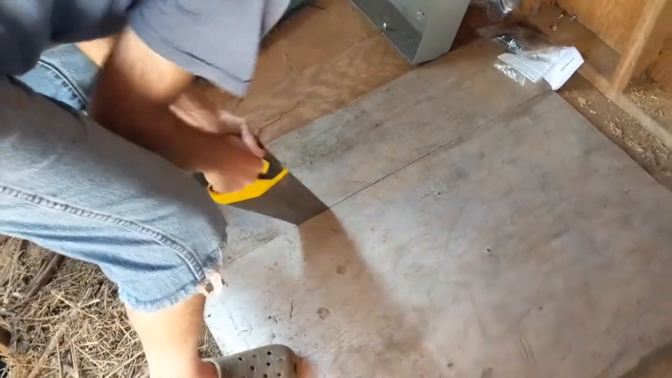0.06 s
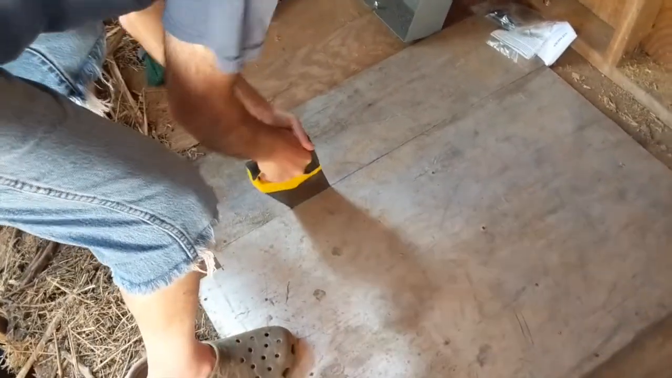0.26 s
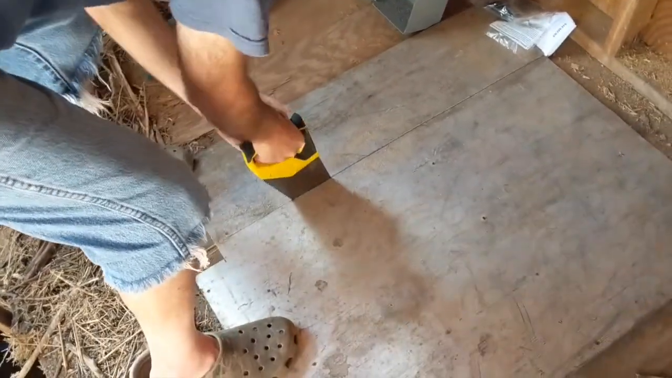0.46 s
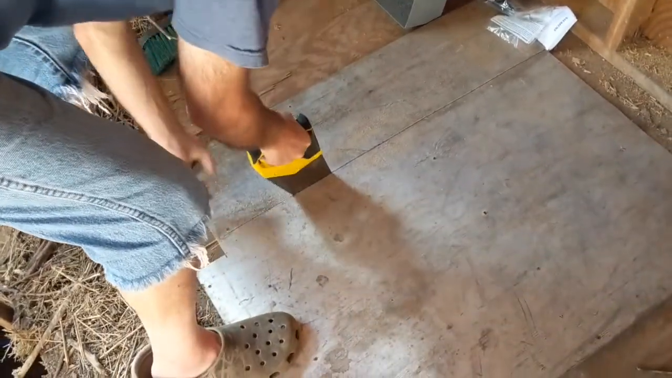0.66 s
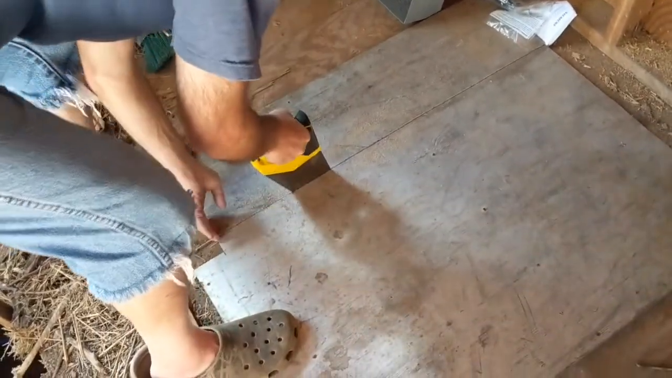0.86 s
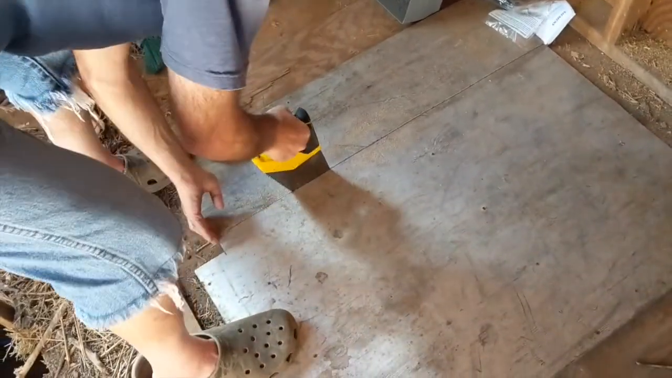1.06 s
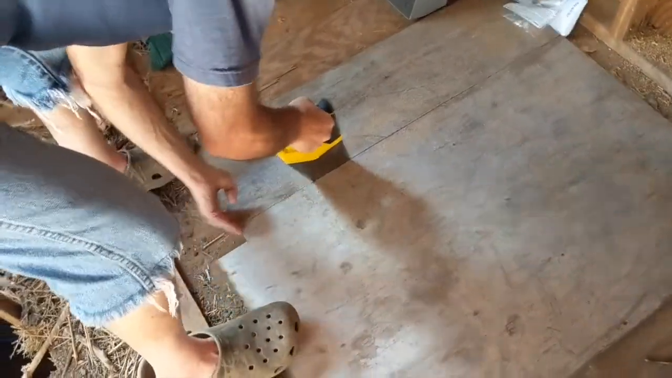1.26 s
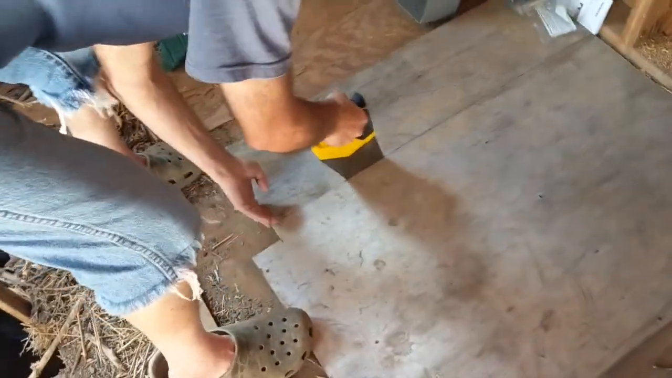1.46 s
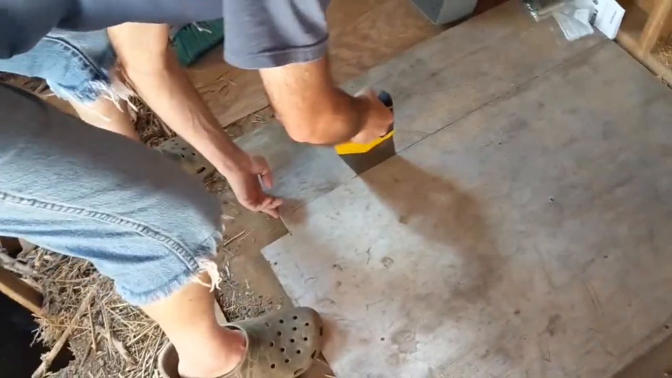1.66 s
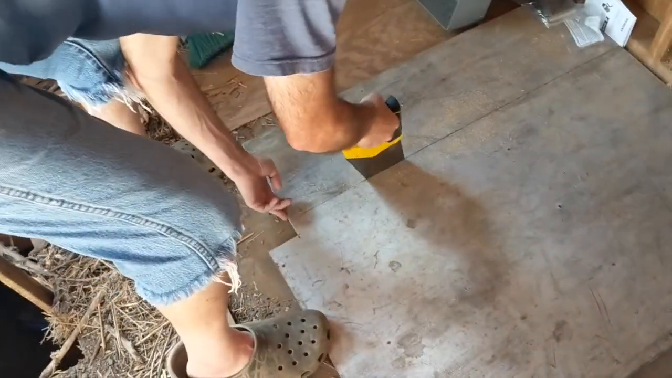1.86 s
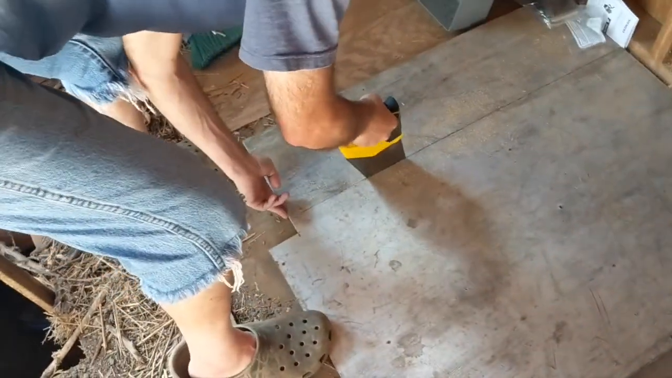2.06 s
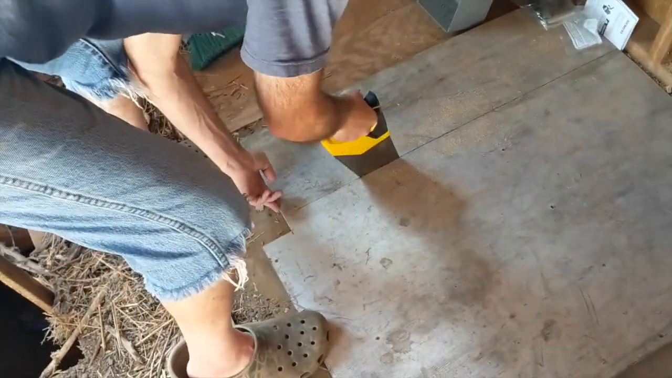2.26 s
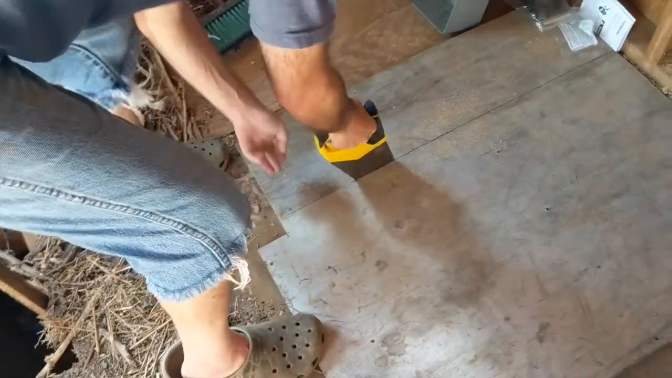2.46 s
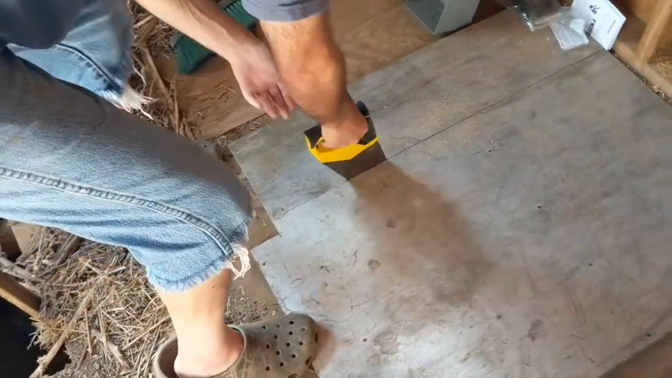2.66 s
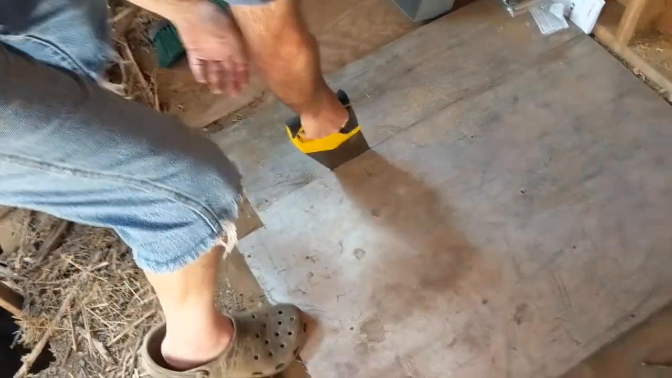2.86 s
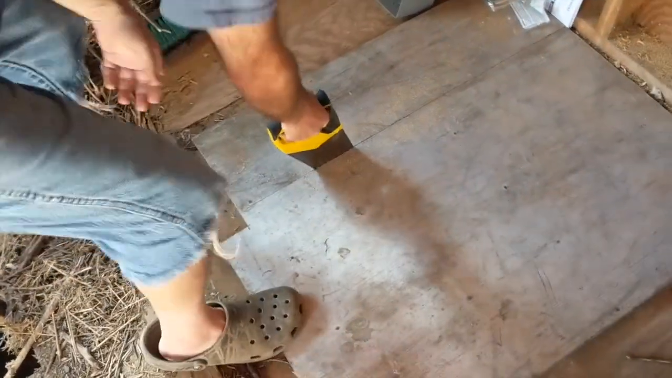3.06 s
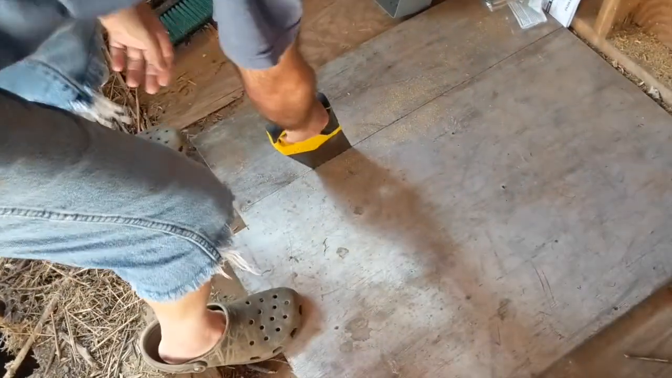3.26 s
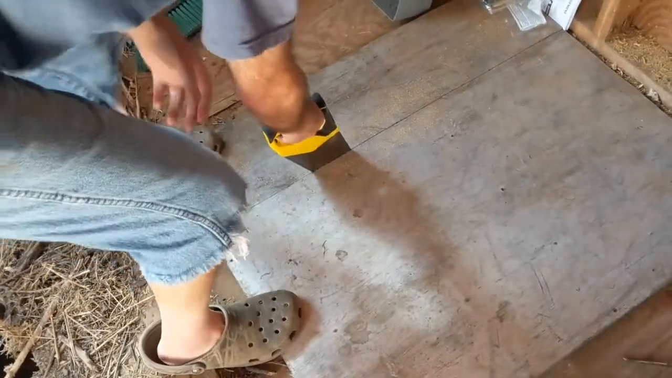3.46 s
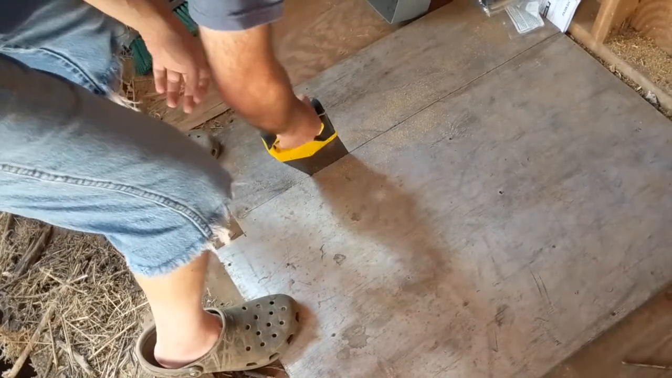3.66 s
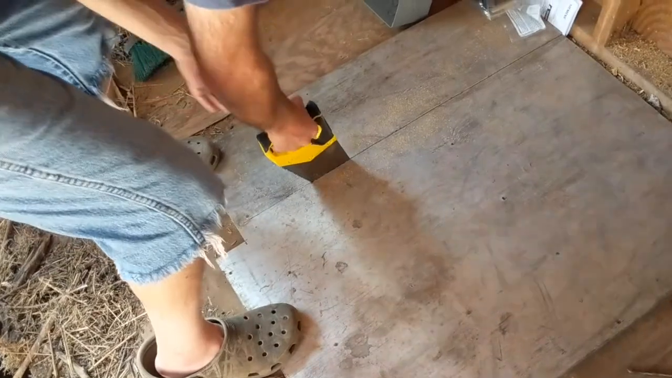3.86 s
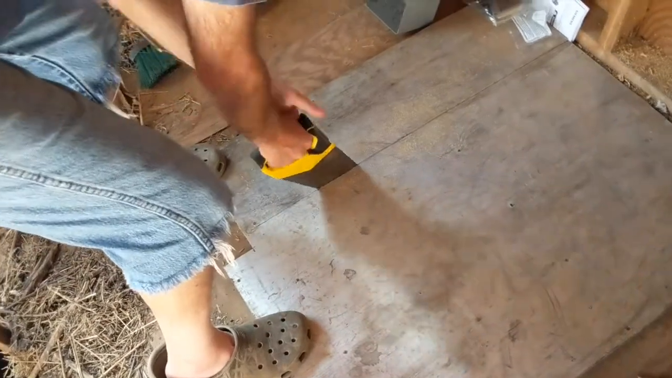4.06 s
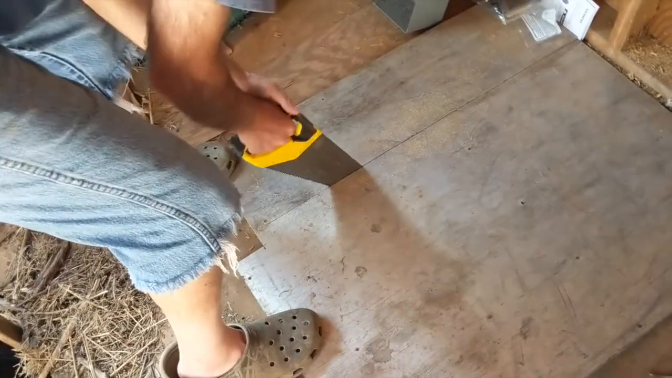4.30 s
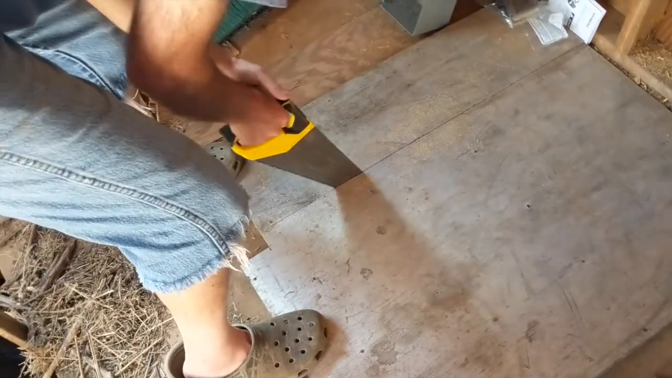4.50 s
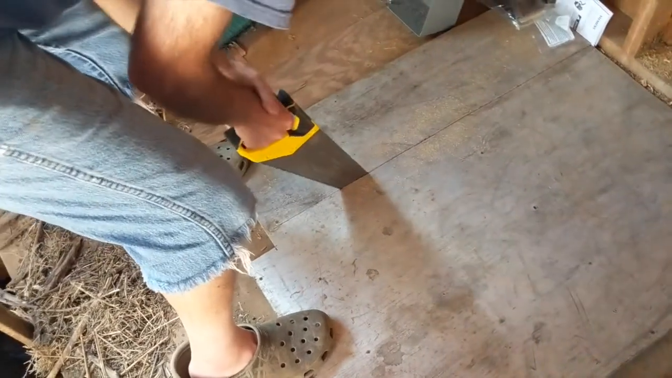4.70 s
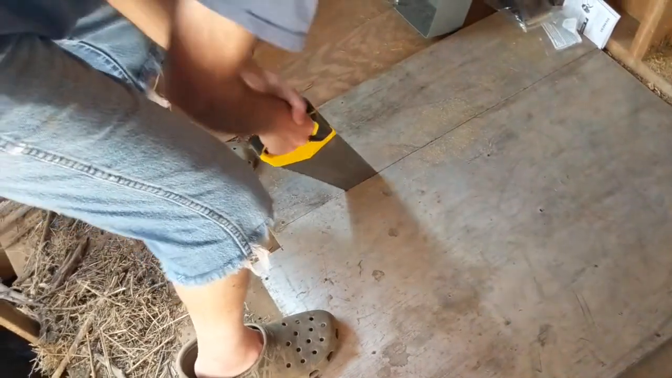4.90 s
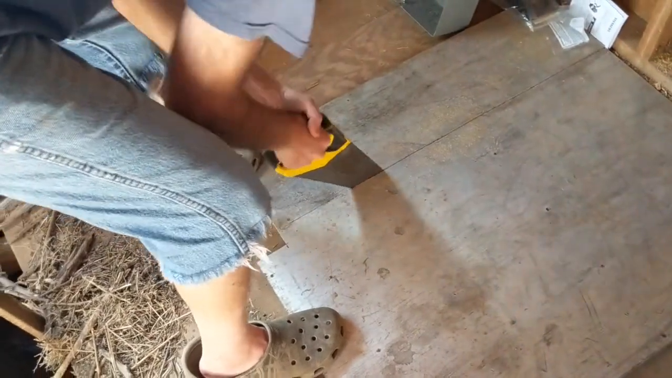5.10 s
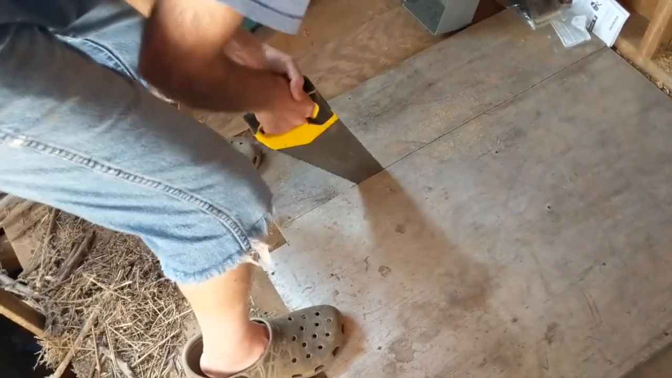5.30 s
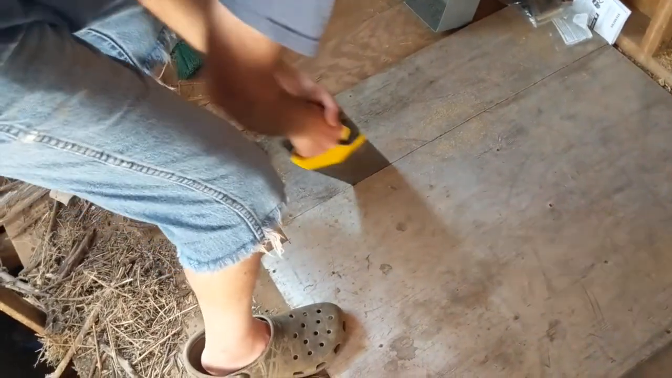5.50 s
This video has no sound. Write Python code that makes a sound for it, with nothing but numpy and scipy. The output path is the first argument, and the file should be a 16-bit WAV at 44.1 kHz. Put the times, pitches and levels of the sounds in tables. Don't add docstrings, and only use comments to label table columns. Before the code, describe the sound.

A hand saw jerks through a plywood floor panel in short rough bursts, with hollow thumps, raspy scrapes and snapping splinters in a bare shed.

```python
import sys
import numpy as np
from scipy import signal
from scipy.fft import rfft, irfft, next_fast_len
from scipy.io import wavfile
from scipy.ndimage import uniform_filter1d, map_coordinates

SR = 44100
rng = np.random.default_rng(int(sys.argv[2]) if len(sys.argv) > 2 else 0)


def to_wav(s):
    ch = np.atleast_2d(s).T
    pcm = np.round(np.clip(ch, -1, 1) * 32767)
    wavfile.write(sys.argv[1], SR, pcm.astype(np.int16))


def makeup_ratio(level_db):
    decades = np.asarray(level_db, float) / 20
    return 10 ** decades


N = 244314


def unit(x):
    return x / np.sqrt(np.mean(x ** 2) + 1e-20)


def along(points, hz):
    f, v = np.transpose(points)
    return np.interp(np.log(hz + 1), np.log(f + 1), v)


def curve(points):
    s, v = np.transpose(points)
    return np.interp(np.arange(N) / SR, s, v)


def wobble(rate_hz):
    knots = rng.standard_normal(int(N * rate_hz / SR) + 4)
    return map_coordinates(knots, [np.arange(N) * rate_hz / SR])


def filtered(x, response):
    m = next_fast_len(N + SR // 2)
    return irfft(rfft(x, m) * response(np.fft.rfftfreq(m, 1 / SR)), m)[..., :N]


def resonances(modes):
    def response(f):
        return sum((-1) ** k * makeup_ratio(db) * 1j * f * width / (hz * hz - f * f + 1j * f * width)
                   for k, (hz, width, db) in enumerate(modes))
    return response


def catches(rate_hz, spread_db):
    strength = makeup_ratio(spread_db * rng.standard_normal(N)) * rng.choice([-1, 1], N)
    return unit(strength * (rng.random(N) < rate_hz / SR))


# (frequency [Hz], density [dB per Hz])
ROOM_TONE = [(20, -14), (40, 2), (60, 0.5), (90, -14), (170, -11), (263, -14.5), (489, -12), (620, -8),
             (1190, -18.5), (2610, -28), (6380, -25), (14800, -36.5), (16000, -36)]
# (frequency [Hz], level [dB rms])
HUM = [(120, -63.5), (617, -74)]
# (start [s], end [s], centre [Hz], width [Hz], level [dB])
CHIRPS = [(0.6, 0.8, 10000, 700, -76), (1.65, 2.95, 7950, 750, -69), (1.93, 2.12, 10100, 600, -74),
          (2.3, 2.7, 10100, 700, -75), (2.88, 3.07, 10100, 600, -76), (3.77, 3.95, 10100, 600, -78),
          (.82, 1.27, 4780, 220, -73), (.82, 1.27, 6150, 500, -73), (1.7, 2.15, 5950, 500, -71),
          (2.65, 3.1, 6200, 600, -72), (2.8, 3.1, 4600, 700, -72), (4.58, 4.92, 4620, 400, -62.5),
          (4.62, 4.92, 6300, 700, -68), (.58, .8, 8200, 800, -76), (3.62, 3.98, 860, 200, -64),
          (.55, .82, 950, 250, -67), (.98, 1.18, 625, 40, -65), (3.2, 3.5, 850, 350, -64)]


def background():
    t = np.arange(N) / SR
    tone = unit(filtered(rng.standard_normal(N), lambda f: makeup_ratio(along(ROOM_TONE, f))))
    out = makeup_ratio(-59 + 0.2 * wobble(5.48)) * tone
    for hz, db in HUM:
        level = np.sqrt(2) * makeup_ratio(db + 2.1 * wobble(3.65) + 3.5 * wobble(14))
        phase = 0.83 * wobble(3.48) + 0.6 * wobble(12)
        out += level * np.sin(2 * np.pi * hz * t + phase)
    air = rng.standard_normal(N)
    for start, end, hz, width, db in CHIRPS:
        band = resonances([(hz, width, 0)])
        buzz = unit(filtered(air, lambda f: band(f) ** 2))
        fade = np.clip(np.minimum(t - start, end - t) / 0.09, 0, 1)
        out += makeup_ratio(db + 3 * wobble(9)) * fade * buzz
    return out


# (full speed at [s], attack [s], hold [s], bite into panel [dB], rasp [dB])
PUSHES = [(0.035, 0.15, 0.09, -25, -27.5), (.15, .05, .03, -33, -40), (0.221, 0.085, 0.08, -16.5, -20),
          (1.367, .19, 0.042, -27.5, -26.5), (2.126, 0.056, 0.035, -60.5, -72.5),
          (3.094, 0.014, 0.031, -30.5, -40), (3.246, 0.11, 0.025, -63, -55.5), (3.37, .1, 0.054, -57, -72),
          (2.235, 0.03, .03, -56, -49.5), (2.985, .06, 0.023, -71, -54.5), (1.277, 0.15, 0.031, -41, -43),
          (0.413, 0.023, 0.039, -68, -58.5), (4.153, 0.061, 0.13, -35, -35),
          (4.496, 0.042, 0.027, -42.5, -41.5), (4.558, 0.13, 0.027, -41, -43),
          (4.637, 0.022, 0.044, -45, -50.5), (4.916, 0.035, 0.026, -26.5, -32),
          (4.955, 0.087, 0.012, -19, -21.5), (5.3, 0.14, 0.07, -34, -35.5), (5.459, 0.19, 0.03, -31, -44),
          (5.508, 0.077, .04, -17.5, -18.5)]
# (time [s], hold [s], bite [dB], rasp [dB])
JERKS = [(1.408, 0.0072, -19, -18.5), (1.573, 0.012, -43.5, -42), (1.627, .003, -66.5, -42.5),
         (1.657, 0.05, -54, -45.5), (2.329, 0.0033, -48.5, -42.5), (3.169, 0.0076, -44, -43),
         (3.456, 0.028, -47, -52), (3.501, 0.028, -26.5, -37.5), (3.568, 0.05, -51, -45.5),
         (4.11, .03, -57, -55), (4.423, 0.043, -45.5, -47), (4.874, .025, -46, -49.5),
         (4.706, 0.0091, -52, -51.5), (.243, .012, -30, -21), (3.082, .012, -42, -45),
         (5.0635, 0.011, -32.5, -20), (5.223, 0.17, -42, -38)]
CONTROL_STEP = 32


def effort(fall_db_per_s, attack_share):
    jerk_attack_s, attack_db, sag_db_per_s = 0.003, 36, 29
    rows = [row[:3] for row in PUSHES] + [(s, jerk_attack_s, hold) for s, hold, _, _ in JERKS]
    s, attack, hold = np.transpose(rows)[:, :, None]
    t = np.arange(0, N, CONTROL_STEP) / SR - s
    climb = attack_share * attack_db * t / attack
    sag = -sag_db_per_s * np.clip(t, 0, hold)
    return np.where(t < 0, climb, sag - fall_db_per_s * np.maximum(t - hold, 0))


def total(move_db, rest_db):
    power = (makeup_ratio(move_db) ** 2).sum(axis=0)
    power = np.interp(np.arange(N), np.arange(0, N, CONTROL_STEP), power)
    return 10 * np.log10(power + makeup_ratio(rest_db) ** 2)


# (time [s], contact [dB])
IDLE = [(0.5, -61), (0.8, -72), (1.08, -64), (1.2, -58), (1.75, -52), (1.86, -58.5), (1.94, -52.5),
        (2.05, -60.5), (2.2, -53.5), (2.32, -51), (2.4, -57.5), (2.55, -61), (3.02, -57.5), (3.4, -61.5),
        (3.8, -60.5), (4.0, -70.5), (4.4, -58), (4.85, -57.5)]


def controls():
    bite, rasp = np.array([row[-2:] for row in PUSHES + JERKS]).T[:, :, None]
    idle_db = curve(IDLE)
    boom_fall_db_per_s, boom_grows, hiss_grows = 80, 0.65, 0.86
    linger = bite - 25 + effort(38, 0.9)
    shake_db = total(np.concatenate([bite + effort(243, 1.0), linger]), idle_db - 6.5)
    boom_db = -16 + boom_grows * total(bite + effort(boom_fall_db_per_s / boom_grows, 1.0), idle_db - 16.5)
    rasp_db = total(rasp + effort(440, 1), idle_db)
    skim = 0.42 * (rasp - bite)
    hiss_db = -19 + hiss_grows * total(rasp + skim + effort(450, 1.24), idle_db)
    return shake_db, boom_db, rasp_db, hiss_db


def steady(x, seconds):
    power = np.abs(uniform_filter1d(x * x, int(seconds * SR)))
    return x / np.sqrt(power + 0.11 * np.mean(x * x))


def grains(rate_hz, modes, t60_s, spread_db):
    draw = rng.random((int(rate_hz * N / SR), 4))
    pick = (draw[:, 1] * len(modes)).astype(int)
    hz, width, db = np.transpose(modes)[:, pick, None]
    t = np.arange(512) / SR
    swell = (1 - np.exp(-t / 0.00068)) * makeup_ratio(db + spread_db * draw[:, 2:3] ** 2 - 60 * t / t60_s)
    rings = swell * np.sin(2 * np.pi * (hz + width * (2 * draw[:, 3:] - 1)) * t)
    at = (draw[:, :1] * N).astype(int) + np.arange(512)
    return unit(np.bincount(at.ravel(), rings.ravel(), N + 512)[:N])


# (frequency [Hz], width [Hz], level [dB])
PANEL = [(233.2, 138, 5), (308, 26, 2), (363.8, 21, 4.5), (434, 18, -1), (507.4, 40, -5), (556, 30, -4.5),
         (614, 17, -1), (677.6, 8.1, -6), (777, 20, -17), (930, 32, -15)]
# (frequency [Hz], width [Hz], level [dB])
JOISTS = [(49.3, 14, 1.5), (63.7, 16.7, 5), (89.4, 9.4, -4), (125.3, 34, -2.5), (174.7, 35, -2),
          (200, 23, -6)]
# (frequency [Hz], width [Hz], level [dB])
BLADE = [(1417, 230, -7), (1525, 152, -0.5), (1862, 145, 0), (2327, 240, -3), (3446, 420, -8.5),
         (4480, 400, -4), (5560, 410, -4), (6000, 204, -1.5), (6660, 440, -1.5), (7430, 355, -14),
         (10100, 130, -12.5)]
# (frequency [Hz], density [dB per Hz])
RASP = [(530, -24), (900, -10.5), (1180, -5.5), (1250, -2.5), (1600, -22), (2040, -11), (2960, -8.5),
        (5140, -7.5), (10000, -33), (13000, -59), (22000, -120)]
# (frequency [Hz], density [dB per Hz])
HISS = [(4410, -32), (7500, -2), (7790, -3), (9850, -8), (14600, -11.5), (16000, -14.5)]
# (time [s], centre of the shaking [Hz])
PLACE = [(0.1, 430), (1.1, 490), (1.42, 300), (2.1, 447), (2.9, 460), (3.1, 298), (4.2, 270), (5.1, 320),
         (5.5, 425)]


def strokes():
    shake_db, boom_db, rasp_db, hiss_db = controls()
    centre_hz = curve(PLACE)

    teeth = catches(400, spread_db=2.5) + 0.8 * rng.standard_normal(N)
    teeth = filtered(teeth, lambda f: 1 / (1 + 1j * f / 1500) ** 2)
    panel = np.zeros(N)
    for mode in PANEL:
        drive = makeup_ratio(-7 * np.abs(np.log2(mode[0]) - np.log2(centre_hz)))
        panel += drive * filtered(teeth, resonances([mode]))
    joists = filtered(catches(140, spread_db=2.0), resonances(JOISTS))

    judder = makeup_ratio(0.9 * wobble(35) + 1.2 * wobble(80) + 1.3 * wobble(200))
    dust = judder * (0.6 * catches(4000, spread_db=3.0) + rng.standard_normal(N))
    steel = resonances(BLADE)
    rasp = unit(filtered(dust, lambda f: makeup_ratio(along(RASP, f)) * (0.81 + np.abs(steel(f)))))
    rasp += 0.75 * judder * grains(1300, BLADE, t60_s=0.04, spread_db=5.0)
    fine = 0.5 * dust + catches(3000, spread_db=3.0)
    hiss = makeup_ratio(1.1 * wobble(24.96)) * unit(filtered(fine, lambda f: makeup_ratio(along(HISS, f))))

    return (makeup_ratio(shake_db - 2.5) * steady(panel, 0.07) + makeup_ratio(boom_db - 3.0) * steady(joists, 0.0195)
            + makeup_ratio(rasp_db - 5.5) * rasp + makeup_ratio(hiss_db - 0.2) * hiss)


# (time [s], peak [dB], centre [Hz], t60 [s])
THUDS = [(0.19, -12, 180, 0.08), (1.41, -18, 530, 0.33), (1.41, -8, 185, 0.3), (2.1, -50, 105, 0.14),
         (3.096, -12, 250, 0.13), (3.125, -20, 400, 0.12), (3.476, -23, 220, 0.3), (3.502, -1, 372, 0.071),
         (3.529, -13.5, 271, 0.21), (4.108, -24.5, 330, 0.38), (4.131, -29, 120, 0.42),
         (4.277, -25, 280, 0.15), (4.922, -9.5, 367, 0.21), (4.938, -1.5, 327, 0.15),
         (5.42, -13.5, 330, 0.27), (3.52, -20, 39.3, 0.24), (4.141, -26, 54, 0.37), (4.3, -33, 60, 0.25),
         (3.12, -27, 61, 0.16), (5.458, -17.5, 125, 0.18), (3.512, -13.5, 130, 0.2),
         (0.302, -34, 81, 0.087), (0.24, -26, 41, 0.22), (2.9, -38, 170, 0.19), (0.0037, -13, 197, 0.13),
         (2.2, -42, 330, 0.15), (4.19, -29, 200, .2), (4.245, -28, 190, .2), (4.297, -29, 210, .25),
         (4.325, -33, 180, .25), (4.65, -41, 300, .12), (4.68, -40, 150, .2), (.36, -30, 190, .25),
         (.08, -28, 60, .3)]


def thuds():
    out = np.zeros(N + SR)
    for s, db, hz, t60 in THUDS:
        t = np.arange(int(SR * min(0.5, 1.2 * t60))) / SR
        ring = np.zeros(len(t))
        for f, _, _ in JOISTS + PANEL + [(hz, 0, 0)]:
            mode_t60 = t60 * (200 / f) ** 0.43
            level = rng.normal(0, 2.6) - 14 * abs(np.log2(f / hz))
            ring += makeup_ratio(level - 60 * t / mode_t60) * np.sin(2 * np.pi * f * t)
        blow = ring / np.abs(ring).max() * (1 - np.exp(-t / 0.0041))
        out[round(s * SR):][:len(t)] += makeup_ratio(db - 2.5) * blow
    return out[:N]


# (time [s], peak [dB], panel pitch [Hz], t60 [s])
GRABS = [(.204, -12.5, 437, 0.069), (.217, -11, 337, 0.052), (.24, -12, 565, 0.043), (.25, -20, 930, 0.1),
         (.259, -9.5, 460, .05), (.274, -10, 419, 0.057), (.289, -13.5, 331, 0.063), (.3, -14.5, 310, .06),
         (.309, -11.5, 503, .04), (1.422, -13, 230, .07), (1.472, -21, 205, .15), (1.53, -30, 170, .2),
         (1.59, -36, 250, .15), (3.527, -19.5, 250, 0.084), (4.6, -37.5, 299, .15), (5.47, -23.5, 522, .06),
         (5.5, -19.5, 556, .06), (5.52, -14.5, 483, .06), (3.488, -36, 960, .04), (0.021, -23, 410, .05),
         (.07, -24, 312, .06), (0.099, -25, 430, .05), (4.909, -20, 389, .05), (4.939, -28, 1260, 0.064),
         (4.957, -9, 305, .07), (4.976, -12, 295, 0.074), (4.988, -11.5, 295, .08), (5.02, -24, 250, 0.063),
         (5.07, -25, 350, 0.043), (4.945, -17, 588, 0.091), (4.97, -22.5, 580, 0.053),
         (5.067, -29, 1300, 0.048), (5.235, -34, 610, .07), (5.285, -30, 620, .07), (5.325, -32, 600, .07),
         (5.3, -30, 370, .08), (5.425, -27, 360, .07), (5.48, -25, 600, .12), (5.53, -14, 400, .05),
         (1.32, -30, 335, .15), (1.37, -29, 330, .07), (1.495, -20, 165, .15), (4.945, -17, 315, .1),
         (3.457, -47, 800, .04), (3.468, -42, 800, .05), (.5, -42, 170, .2)]


def grabs():
    s, db, hz, t60 = np.transpose(GRABS)[:, :, None]
    t = np.arange(SR // 5) / SR
    beside = hz * rng.uniform(0.8, 1.25, hz.shape)
    pluck = np.sin(2 * np.pi * hz * t) + 0.35 * np.sin(2 * np.pi * beside * t)
    rings = makeup_ratio(db - 60 * t / t60) * (1 - np.exp(-t / 0.0023)) * pluck
    at = (s * SR).astype(int) + np.arange(len(t))
    return np.bincount(at.ravel(), rings.ravel(), N + len(t))[:N]


def wood_ring(hz, t):
    dull = hz < 2500
    octaves = rng.standard_normal((14, 1)) * np.arange(14)[:, None] / 7
    near = np.clip(hz * 2 ** ((0.26 if dull else 0.3) * octaves), 600, 12000)
    phase = rng.uniform(0, 2 * np.pi, (14, 1))
    wood = (makeup_ratio(-4 * np.abs(octaves) - 13.0) * np.sin(2 * np.pi * near * t + phase)).sum(axis=0)
    wood += (1.5 if dull else 1.1) * np.sin(2 * np.pi * hz * t)
    if dull:
        wood += 1.3 * np.sin(2 * np.pi * 1.3 * hz * t)
    return wood / (2 * np.std(wood[:300]))


# (frequency [Hz], level [dB], t60 [s])
RING = [(2540, -4, .05), (3290, 0, 0.14), (3600, -3, .08), (4280, 5, 0.087), (5070, -3, 0.04),
        (5900, -1, 0.05), (7800, 0, .04), (10100, -6, .05)]


def blade_ring(hz, t):
    ring = np.zeros(len(t))
    for f, db, t60 in RING:
        level = db + rng.normal(0, 2) - 5.5 * abs(np.log2(f / hz))
        ring += makeup_ratio(level - 60 * t / t60) * np.sin(2 * np.pi * f * t)
    return ring


# (time [s], peak [dB], centre [Hz], t60 [s], relative crack [dB])
TAPS = [(1.368, -13, 1516, 0.027, -27), (1.409, -3, 1620, 0.018, -12.5), (2.096, -41, 1120, 0.024, -28),
        (2.1224, -28.5, 1130, 0.035, -30), (2.7743, -43, 1790, 0.027, -21), (3.163, -18, 1357, 0.021, -26),
        (3.5092, -20, 1375, 0.028, -16), (3.278, -47, 1290, 0.082, -30), (3.3, -49, 1820, .06, -33),
        (2.25, -36, 2420, 0.013, -12), (4.432, -52, 1540, 0.044, -30), (5.305, -35, 1140, 0.07, -27),
        (2.1235, -44, 1600, .03, -30), (2.137, -42, 680, .04, -30), (1.245, -46, 1270, .05, -30),
        (3.285, -47, 1150, .06, -30)]
# (time [s], peak [dB], centre [Hz], t60 [s], relative crack [dB])
SNAPS = [(1.5736, -13, 4950, 0.013, -14), (1.6264, -14, 4440, 0.016, -12), (1.647, -16, 5300, 0.0094, -8),
         (5.0638, -12, 6580, 0.041, -7.5), (5.071, -7.5, 5290, 0.015, -22),
         (5.2252, -30, 5100, 0.061, -3.5)]
# (time [s], peak [dB], centre [Hz], relative crack [dB])
SPLINTERS = [(1.407, -17, 4930, -6), (1.4214, -24, 6960, -13), (1.4278, -38, 4270, -18),
             (1.5134, -33, 5400, -5), (1.517, -29, 5200, -9), (1.592, -32, 5000, -2),
             (1.603, -37, 5200, -15.5), (1.6542, -27, 4260, -3), (1.664, -26, 4370, -8),
             (1.672, -30, 7800, -10), (1.682, -33, 5900, -12), (1.69, -34, 4300, -16),
             (1.7044, -32, 3200, -7), (1.719, -37, 3200, -14), (1.758, -40, 5000, -10),
             (1.401, -19, 10100, -20), (1.8854, -45, 4200, -14), (1.94, -46, 4000, -16),
             (2.219, -46, 8000, -3), (2.332, -27, 5670, -8.5), (2.4124, -44, 4400, -6),
             (2.7743, -40, 3320, -8), (2.7756, -45, 2600, -12), (2.331, -40, 11100, -3),
             (3.083, -38, 4090, -9), (3.1113, -36, 3470, -16), (3.2277, -36.5, 4110, -11),
             (3.5105, -30, 8000, -10), (3.4715, -47, 4600, -15), (3.482, -50, 6000, -10),
             (3.488, -41, 5030, -10), (3.51, -23.5, 4300, -14), (3.5464, -30, 3160, -7),
             (3.562, -31, 4600, -7), (3.5789, -28.5, 6600, -4.5), (3.58, -24, 4380, -14),
             (3.6, -31, 4200, -9), (3.609, -34, 4300, -9), (3.617, -36, 5030, -11), (4.068, -47, 8700, -10),
             (4.142, -35, 5230, -8), (4.364, -50, 5000, -8), (4.417, -46, 5560, -12),
             (4.4939, -30, 4960, -4), (4.525, -39, 4400, -6), (4.66, -42, 4460, -4), (4.705, -42, 6550, -6),
             (4.9048, -27, 5700, -13), (1.765, -39.5, 4930, -14), (1.545, -36, 4620, -8),
             (2.114, -48, 6000, 0), (2.118, -50, 7500, -3), (2.2043, -50, 7780, -6), (2.2155, -44, 2700, -12),
         (2.2172, -46, 5550, -8), (2.222, -43, 9800, -4), (2.2197, -46, 11500, -3), (3.457, -48, 4500, -10),
         (2.2495, -44, 5500, -6), (2.307, -48, 3800, 0), (2.3295, -36, 5700, -8), (1.5745, -30, 9300, -4),
         (1.6255, -36, 9500, -4), (1.648, -28, 10800, -6)]
# (frequency [Hz], level [dB])
CRACK = [(800, -29), (2500, 4), (6000, 9.5), (10000, 1), (16000, -28)]


def taps():
    out, t = np.zeros(N + SR), np.arange(SR // 8) / SR
    fibre = unit(filtered(rng.standard_normal(N), lambda f: makeup_ratio(along(CRACK, f))))
    small_t60 = 0.018
    small = [(s, db, hz, small_t60, crack_db) for s, db, hz, crack_db in SPLINTERS]
    for s, db, hz, t60, crack_db in TAPS + SNAPS + small:
        wood = wood_ring(hz, t) * makeup_ratio(-60 * t / t60)
        crack = np.roll(fibre, -round(s * SR))[:len(t)] * makeup_ratio(crack_db + 4 - 60 * t / (0.49 * t60))
        click = makeup_ratio(crack_db - 17 - 60 * t / 0.003) * np.diff(rng.standard_normal(len(t) + 1))
        body = wood + 0.023 * blade_ring(hz, t) + crack + click
        out[round(s * SR):][:len(t)] += makeup_ratio(db - 1.0) * body * (1 - np.exp(-t / 0.00029))
    return out[:N]


# (frequency [Hz], t60 [s])
SHED = [(100, 0.49), (500, 0.37), (2000, 0.33), (6000, 0.25), (14000, 0.18)]


def shed(x):
    hz, t, z = signal.stft(rng.standard_normal(SR // 2), SR, nperseg=256)
    decay = makeup_ratio(-60 * t / along(SHED, hz)[:, None])
    tail = signal.istft(z * decay, SR, nperseg=256)[1]
    delayed = np.pad(x, (200, 0))
    return signal.fftconvolve(delayed, tail / np.linalg.norm(tail))[:N]


def scene():
    saw, snaps, blows = strokes(), taps(), thuds() + grabs()
    sent = makeup_ratio(-8.5) * saw + makeup_ratio(-8.0) * snaps + makeup_ratio(-7.5) * blows
    return (saw + snaps + blows + shed(sent) + background())[None]


def top_cut(x):
    return signal.sosfilt(signal.butter(12, 15960, fs=SR, output="sos"), x)


def record(dry):
    low_hz, top_hz, limit = 27, 15950, 0.5
    rounded = dry[0] / (1 + np.abs(dry[0] / limit) ** 4) ** (1 / 4)
    mix = filtered(rounded, lambda f: (1j * f / (1j * f + low_hz)) ** 5 * (f < top_hz))[None]
    return top_cut(mix)


dry = scene()
out = record(dry)
to_wav(out)
```